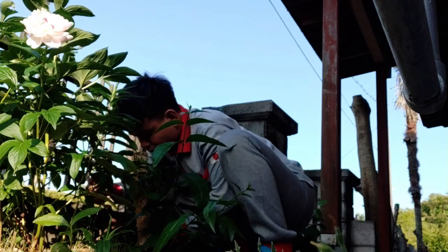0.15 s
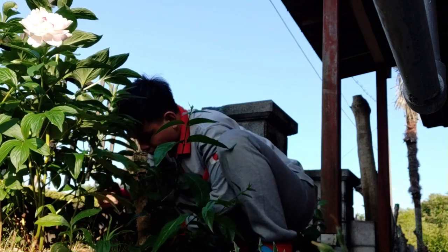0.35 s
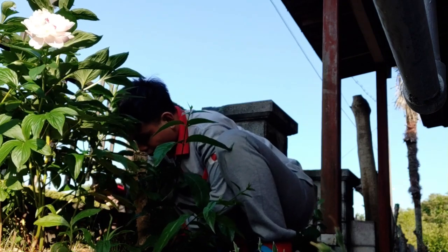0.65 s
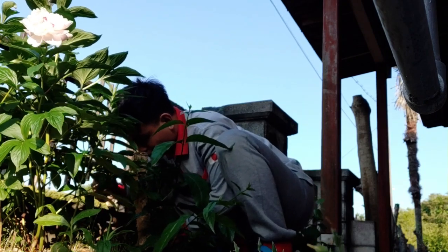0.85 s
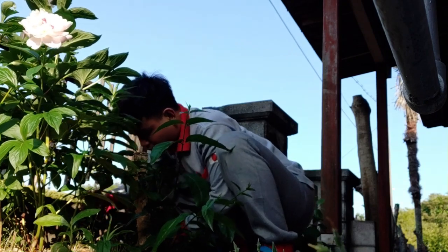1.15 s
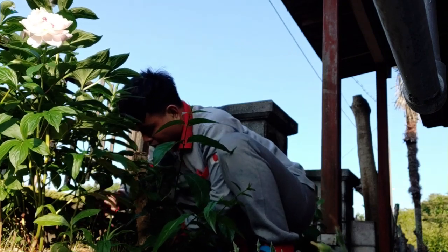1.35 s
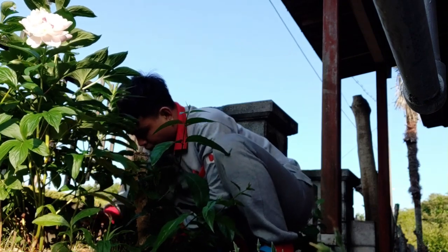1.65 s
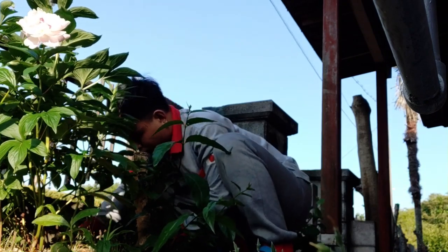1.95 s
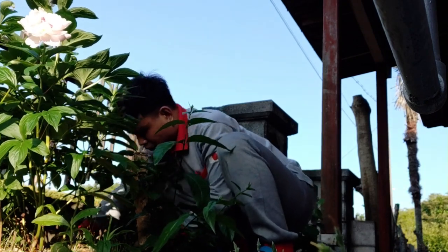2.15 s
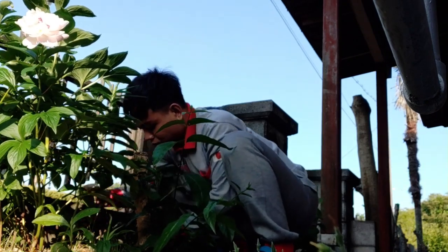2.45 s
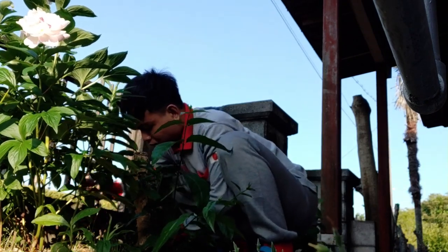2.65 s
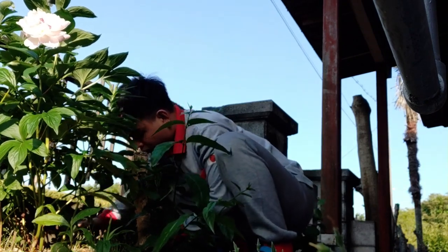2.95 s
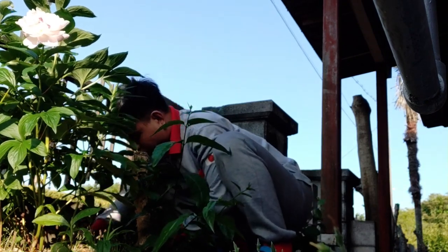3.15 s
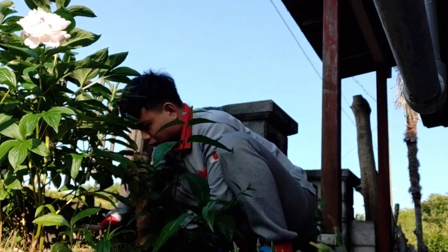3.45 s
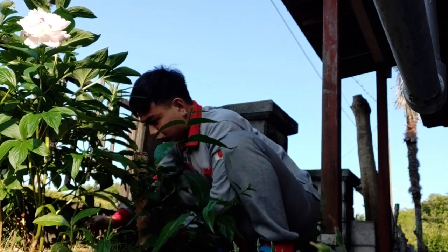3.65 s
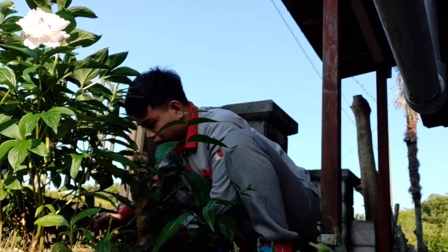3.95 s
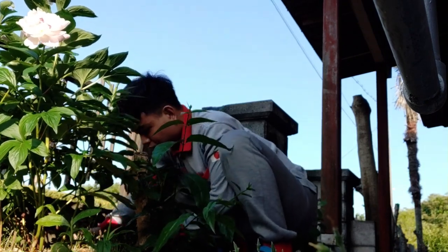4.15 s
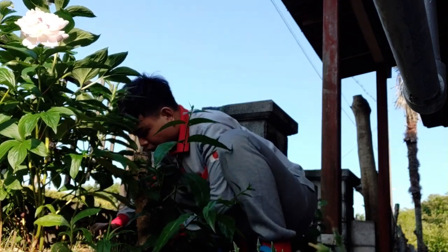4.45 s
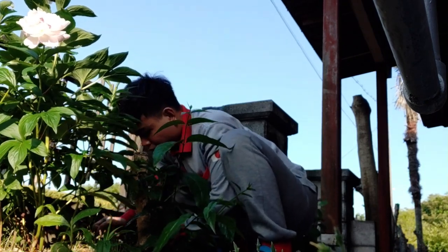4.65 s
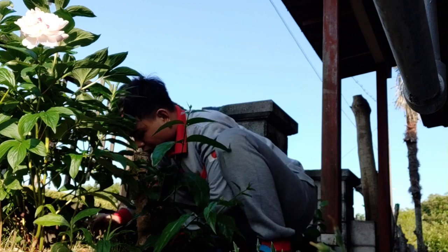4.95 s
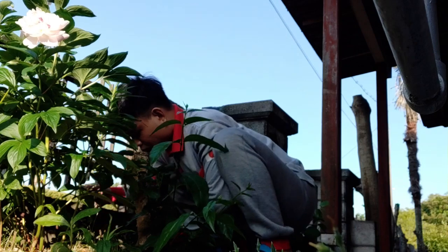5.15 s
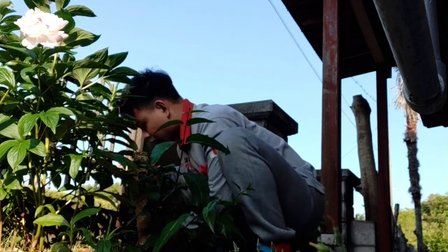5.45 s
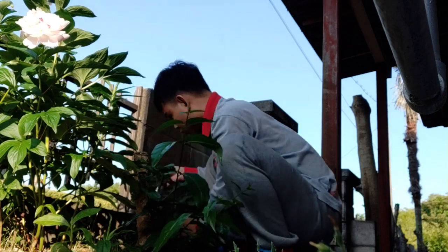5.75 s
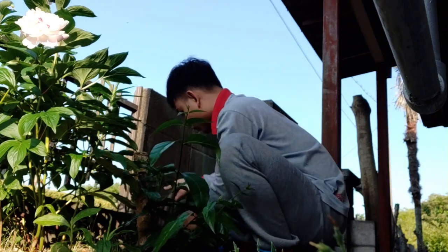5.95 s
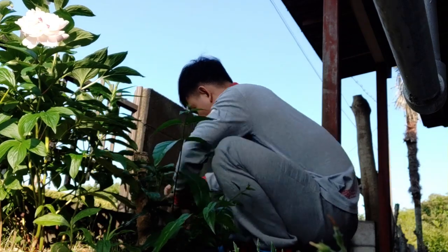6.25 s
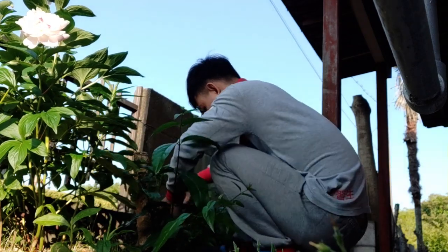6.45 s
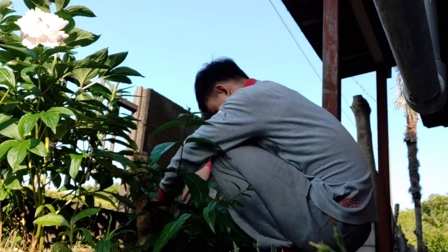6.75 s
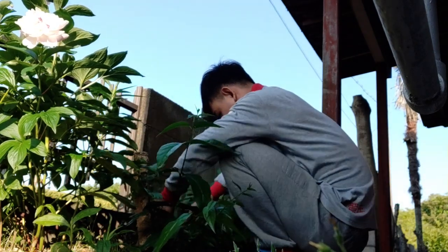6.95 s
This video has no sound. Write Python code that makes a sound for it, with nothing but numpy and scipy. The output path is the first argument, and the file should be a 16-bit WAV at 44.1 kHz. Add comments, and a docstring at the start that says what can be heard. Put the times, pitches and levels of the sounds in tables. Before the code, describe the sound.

Leaves rustle and stems tear as weeds are pulled by hand outdoors, then a thick stalk cracks sharply; low wind bumps early over distant roar.

```python
"""At first a breeze buffets two microphone ports, with dull low bumps, over a steady distant roar: filtered noise.
Throughout, weeds are pulled by hand beside a house: leaves brush, handfuls strain until they give, roots tear
and stems snap, built from coloured clicks and hiss with short resonances; the wall adds a short echo of noise taps.
Near the end a thick stalk cracks twice in quick splinters, as brief sine rings with noise edges and crunching
fibres, with dull thuds among and after them; a faint wavering sine hum joins the last half second."""
import sys
import numpy as np
from scipy import signal
from scipy.fft import rfft, irfft
from scipy.io import wavfile
from scipy.ndimage import uniform_filter1d

SR = 44100
rng = np.random.default_rng(int(sys.argv[2]) if len(sys.argv) > 2 else 0)


def materialize(psi):
    """Save the field psi as 16-bit PCM at rate SR to the path in sys.argv[1].

    A 1-D psi becomes a single channel; in a 2-D psi each row is a channel.
    """
    bounded = np.clip(np.atleast_2d(psi).T, -1, 1)
    quanta = np.round(bounded * 32767).astype(np.int16)
    wavfile.write(sys.argv[1], SR, quanta)


N = 312644
TIME = np.arange(N) / SR  # s
HALVES = np.array([[0.5], [-0.5]])  # shares a left-right level difference between the ports

# direction of the near sounds: hz, left_minus_right_db
PORT_BALANCE = [(200, -2.5), (800, -0.5), (1400, -1), (2200, -1), (2900, 8), (4400, 2.5), (6500, 2),
                (8500, -20), (11000, -11), (13500, -1), (16000, -12)]
# splinters of the thick stalk: start_s, peak_db (right port), ring_hz, length_s (the ring peaks after 0.88 of it),
# edge_db (the edge starts 0.5 dB below peak_db + edge_db, before colouring), edge_top_hz
SPLINTERS = [(6.3945, -26, 1900, .0004, -20, 4000), (6.3968, -26, 2100, .0004, -15, 4000),
             (6.4038, -25, 1900, .0004, -6, 10000), (6.4065, -12.5, 1580, .00098, -9, 14000),
             (6.4202, -19.5, 1560, .0006, -12, 12000), (6.4338, -14.5, 1610, .00092, -25, 12000),
             (6.4354, -21, 1600, .00055, 1, 12000), (6.8754, -26, 1810, .00055, -14, 5000),
             (6.8783, -21.5, 1790, .0007, -12, 5000), (6.8908, -34, 2000, .00064, -5, 8900),
             (6.9017, -23.5, 1860, .00065, -7, 4500)]


def amp(db):
    """A level in decibels is 20 times the logarithm of the amplitude ratio returned."""
    return 10 ** (np.asarray(db) / 20)


def unit(x):
    """Mean power sets the level: scales to an rms of 1."""
    return x / np.sqrt(np.mean(x ** 2) + 1e-20)


def read(points, hz):
    """Pitch is logarithmic in frequency: interpolates a table on a log-frequency axis."""
    f, value = np.transpose(points)
    return np.interp(np.log(hz + 1), np.log(f + 1), value)


def curve(rows):
    """A line in decibels is an exponential in amplitude: joins (s, dB) rows, near silence outside."""
    return np.interp(TIME, *np.transpose(rows), left=-120, right=-120)


def add(mix, s, sound):
    """Superposition: adds a sound to the mix in place, from time s."""
    part = mix[..., max(round(s * SR), 0):][..., :sound.shape[-1]]
    part += sound[..., :part.shape[-1]]


def together(gains):
    """Unrelated sounds add in power: their joint gain."""
    return np.sqrt(sum(gain ** 2 for gain in gains))


def stroke(start, length, rise_db_per_s, fall_db_per_s, sag_db_per_s=0):
    """Exponential growth and decay: gain rises until start, sags while held, then falls away."""
    t = TIME - start
    db = rise_db_per_s * np.minimum(t, 0)
    db -= sag_db_per_s * np.clip(t, 0, length)
    db -= fall_db_per_s * np.maximum(t - length, 0)
    return amp(np.maximum(db, -120))


def colour(x, spectrum, balance=((1, 0), (2, 0)), size=4096):
    """Minimum-phase filtering: a causal two-channel filter of unit power gain, by folding the cepstrum."""
    hz = np.fft.rfftfreq(size, 1 / SR)
    gain = amp(read(spectrum, hz) + HALVES * read(balance, hz))
    cepstrum = irfft(np.log(unit(gain) + 1e-6))
    cepstrum[:, 1:size // 2] *= 2
    cepstrum[:, size // 2 + 1:] = 0
    response = irfft(np.exp(rfft(cepstrum)))
    return signal.oaconvolve(np.atleast_2d(x), response, axes=1)[:, :N]


def crackle(per_s, spread_db, hiss, lag_limit=26):
    """Shot noise: random clicks of uneven size, each with its own port lag in samples, over a smooth hiss."""
    size = amp(spread_db * np.minimum(rng.exponential(1, N), 4)) * rng.choice([-1, 1], N)
    clicks = size * (rng.random(N) < per_s / SR)
    later = np.minimum(np.arange(N) + rng.integers(0, lag_limit, N), N - 1)
    ports = np.array([clicks, np.bincount(later, clicks, N)])
    return unit(unit(ports) + hiss * rng.standard_normal((2, N)))


def distance(level_db=-54.03):
    """Partial coherence: a dull steady roar whose likeness at the ports varies with frequency."""
    # hz, level_db (per Hz)
    roar = [(20, -14.5), (45, -10), (85, 1), (130, -3.5), (270, -1.5), (400, -7.5), (750, -10.5),
            (1300, -8.5), (1720, -16), (1950, -24.5), (2300, -41.5), (4000, -61), (8000, -59.5),
            (11000, -76), (16000, -64.5)]
    # hz, correlation (left-right likeness, negative when opposed)
    likeness = [(60, 0.87), (130, 0.94), (290, 0.91), (640, 0.26), (1410, -0.68), (3100, 0.94),
                (6820, 0.01), (15000, -0.03)]
    # hz, left_minus_right_db
    tilt = [(100, -0.5), (220, -0.5), (380, -2.5), (700, -3.5), (1300, 0), (2400, 9.5)]
    a, b = rfft(rng.standard_normal((2, N)))
    same = np.clip(read(likeness, np.fft.rfftfreq(N, 1 / SR)), -1, 1)
    noise = irfft([a, same * a + np.sqrt(1 - same ** 2) * b], N)
    return amp(level_db) * colour(noise, roar, tilt)


def wind():
    """Turbulent pressure is unrelated between ports: a dying breeze, and eddies striking one port each."""
    # hz, level_db (per Hz)
    rumble = [(15, -24), (40, -5.5), (70, 7), (150, 3.5), (220, -10), (350, -25), (600, -28.5),
              (1500, -66.5), (4000, -92)]
    # steady breeze, before the common 3.5 dB cut below: time_s, level_db
    breeze = [(0, -52.5), (1.0, -45.5), (1.5, -52.5), (1.85, -50), (2.45, -61.5), (4, -75)]
    # eddies, before the same cut: peak_s, peak_db, half_width_s (to 1/e of power), port (0 left, 1 right)
    gusts = [(.06, -33, 0.062, 1), (.19, -35.5, 0.06, 1), (.285, -40, 0.013, 1), (0.457, -30, 0.013, 1),
             (.575, -34, 0.02, 1), (.7, -34, 0.014, 0), (.82, -37, 0.033, 1), (.99, -38, .02, 0),
             (1.11, -33.5, 0.032, 1), (1.47, -39, 0.037, 1), (1.655, -39, 0.038, 1),
             (1.665, -37.5, 0.013, 0), (1.775, -38, 0.027, 1), (2.28, -42.5, 0.021, 1),
             (2.84, -48, 0.033, 0), (3.14, -51, 0.06, 1)]
    power = np.tile(amp(curve(breeze)) ** 2, (2, 1))
    for s, db, half_width, port in gusts:
        power[round(port)] += amp(db) ** 2 * np.exp(-((TIME - s) / half_width) ** 2)
    return colour(rng.standard_normal((2, N)), rumble) * np.sqrt(power) * amp(-3.5)


def hum(start_s=6.54, length_s=0.55, level_db=-61.5, pitch_hz=273.4, waver_hz=4, waver_s=0.0464):
    """Frequency modulation: phase is the sum of a pitch that wavers by waver_hz rms in a faint low tone."""
    waver = unit(uniform_filter1d(rng.standard_normal(N), int(waver_s * SR)))
    level = amp(level_db) * stroke(start_s, length_s, rise_db_per_s=350, fall_db_per_s=350)
    phase = 2 * np.pi * np.cumsum(pitch_hz + waver_hz * waver) / SR
    return level * np.sqrt(2) * np.sin(phase)


def yard(x, echo_db):
    """Diffuse reverberation: wall and eaves return sparse random taps that decay by frequency."""
    # hz, t60_s
    reverberation = [(200, .35), (1500, 0.49), (4000, 0.05), (8000, 0.11), (15000, 0.26)]
    t = np.arange(SR // 2) / SR
    taps = rng.standard_normal((2, len(t))) * (rng.random((2, len(t))) < .15) * (t > .004)
    hz, when, z = signal.stft(taps, SR, nperseg=256)
    decay = amp(-60 * when / read(reverberation, hz)[:, None])
    tail = signal.istft(z * decay, SR, nperseg=256)[1]
    return x + amp(echo_db) * signal.oaconvolve(x, tail / np.linalg.norm(tail[0]), axes=1)[:, :N]


def thuds():
    """Heavy damping: short low pushes swell and die with hardly any ring."""
    # start_s, peak_db (of the right envelope), pitch_hz, swell_s, left_minus_right_db
    bumps = [(.102, -29, 152, 0.0028, -9), (0.213, -23, 155, 0.0027, -27), (1.14, -23.5, 169, 0.002, -30),
             (1.492, -32.5, 145, 0.0024, -22), (1.766, -34.5, 167, 0.0022, -2.5),
             (6.409, -55, 220, 0.0049, 2), (6.432, -34.5, 380, 0.0015, -4), (6.899, -42, 154, 0.0061, 1),
             (6.905, -34.5, 367, 0.001, 1), (6.917, -41.5, 304, 0.003, 2), (6.922, -44.5, 91, 0.0077, 1)]
    out, t = np.zeros((2, N)), np.arange(SR // 10) / SR
    for s, db, hz, swell, left_db in bumps:
        push = t / swell * np.exp(1 - t / swell) * np.sin(2 * np.pi * hz * t)
        add(out, s, amp([[db + left_db], [db]]) * push)
    return out


def faint_rings(per_s=1500, spread_db=0.5, cycles=5, count=30):
    """Damped sines: many brief faint rings at random times, over thirty pitches, make the rustle more tonal."""
    out, t = np.zeros((2, N)), np.arange(SR // 50) / SR
    size = amp(spread_db * np.minimum(rng.exponential(1, N), 3)) * (rng.random(N) < per_s / SR)
    choice = rng.integers(0, count, N)
    pitches = np.linspace(1300, 9000, count) + rng.uniform(-100, 73, count)
    for k, hz in enumerate(pitches):
        phase = 2 * np.pi * (hz * t + rng.random((2, 1)))
        ring = np.sqrt(hz) * np.exp(-t * hz / cycles) * np.sin(phase)  # the root evens out the energy
        out += signal.oaconvolve((size * (choice == k))[None], ring, axes=1)[:, :N]
    return unit(out)


def leaf_grains(clump_db, clump_s, ring_db):
    """Friction by many small contacts: leaves slide past the hands in clumps of clicks, with faint rings."""
    clumps = unit(uniform_filter1d(rng.standard_normal(N), int(clump_s * SR)))
    grains = crackle(per_s=2200, spread_db=1.0, hiss=0.92) + amp(ring_db) * faint_rings()
    return unit(grains) * amp(clump_db * clumps - 1.0)


def patchy(x, patchy_db=5, patch_hz=300, patch_s=.09):
    """Random time-frequency gain: bands of the rustle swell and fade in irregular patches."""
    hz, _, z = signal.stft(x, SR, nperseg=512)
    patches = rng.standard_normal(z.shape[1:])
    patches = uniform_filter1d(patches, max(round(patch_hz / hz[1]), 1), axis=0)
    patches = uniform_filter1d(patches, max(round(patch_s * SR / 256), 1), axis=1)
    gain = amp(patchy_db * np.minimum(unit(patches), 1.5))
    return signal.istft(z * unit(gain), SR, nperseg=512)[1][:, :N]


def rustle():
    """Contact excitation: an arm sweeps the leaves; each click fizzes at the edge and knocks the blade."""
    # start_s, length_s, level_db (of the gain on the grains), body_db (knocks are 1.5 dB below this, re fizz)
    brushes = [(0.0, 0.13, -65.5, 0.5), (0.332, 0.025, -62.5, -3.5), (.56, 0.065, -70.5, -1),
               (0.826, 0.0071, -66.5, -2.5), (0.919, 0.096, -60, -1.5), (1.157, 0.12, -58, 0.5),
               (1.328, .1, -64.5, 4.5), (1.445, 0.1, -57, 2.5), (1.563, 0.11, -53.5, 2),
               (1.719, 0.47, -60, 1.5), (2.403, 0.19, -70.5, 1), (2.752, 0.22, -62.5, -21),
               (2.993, 0.28, -63.5, 5.5), (3.535, 0.36, -71, 5.5), (4.113, .18, -64, 5.5),
               (4.386, 0.2, -66, 3.5), (4.672, 0.094, -66, 3.5), (5.097, 0.098, -63, 2.5),
               (5.397, 0.087, -92, 1.5), (5.497, 0.16, -77, -3), (5.631, 0.26, -68, 9),
               (6.073, 0.46, -63.5, 4.5), (6.293, 0.21, -54.5, 6.5), (6.508, 0.2, -59.5, 5.5),
               (6.78, 0.44, -70, 10)]
    # blade knocks: hz, level_db (per Hz)
    blade = [(100, -26), (400, 1.5), (800, -11), (1100, 13.5), (1380, 5), (1750, 7), (2250, 2), (2850, 2.5),
             (3600, -16), (6000, -42.5)]
    # edge fizz: hz, level_db (per Hz)
    leaf_edge = [(500, -57), (2200, -28.5), (2900, -3.5), (3800, -12), (4800, 0.5), (6500, 3), (8200, -1),
                 (9200, -7), (10500, -7.5), (12300, -14.5), (13500, -10), (15500, -15)]
    fizz_gains, knock_gains = [], []
    for s, length, db, body_db in brushes:
        # the leaves are met, the arm slows, the leaves settle
        gain = amp(db) * stroke(s, length, rise_db_per_s=768.5, fall_db_per_s=167, sag_db_per_s=18.5)
        fizz_gains.append(gain)
        knock_gains.append(gain * amp(body_db - 1.5))
    grains = leaf_grains(clump_db=1.7, clump_s=.0093, ring_db=-9)
    fizz = colour(grains * together(fizz_gains), leaf_edge, PORT_BALANCE)
    knocks = colour(grains * together(knock_gains), blade, PORT_BALANCE)
    return patchy(fizz + knocks)


def tugs(sharpness=10):
    """Friction under load: the scrape swells with strain and stops as the plant gives; taut stems resonate."""
    # fully_taut_s, level_db (of the gain on the grains), build_up_s (e-folding), ring_db (re scrape gain)
    handfuls = [(0.461, -48.5, .012, -3), (1.47, -60, .01, 7.5), (1.62, -57, 0.025, 5.5),
                (2.522, -57.5, 0.055, 3.5), (2.972, -46.5, 0.051, -4.5), (3.459, -58.5, 0.022, -6.5),
                (5.058, -52, 0.019, -2), (6.39, -57, 0.049, -9), (7.015, -53.5, 0.051, -10)]
    # pitch_hz, level_db
    taut_stems = [(1350, -5.5), (2850, -20.5)]
    # stalks scraping through the fist: hz, level_db (per Hz)
    fist = [(150, -20), (500, 3.5), (1150, 0.5), (1900, 1), (2850, 3), (3700, -7.5), (4800, -1), (6300, 6),
            (8200, -2), (9500, -8), (13000, -8), (15500, -14)]
    scrape_gains, ring_gains = [], []
    for s, db, build_up, ring_db in handfuls:
        rise = 20 / np.log(10) / build_up  # dB per s
        gain = amp(db) * stroke(s, length=0.02, rise_db_per_s=rise, fall_db_per_s=308)
        scrape_gains.append(gain)
        ring_gains.append(gain * amp(ring_db))
    grains = leaf_grains(clump_db=1.65, clump_s=0.023, ring_db=-7)
    scrape = colour(grains * together(scrape_gains), fist, PORT_BALANCE)
    drive = grains + .5 * grains[::-1]  # each port hears some of the other
    stems = np.zeros((2, N))
    for hz, db in taut_stems:
        ring = unit(signal.lfilter(*signal.iirpeak(hz, sharpness, fs=SR), drive))
        stems += amp(db + HALVES * read(PORT_BALANCE, hz)) * ring
    return patchy(scrape) + stems * together(ring_gains)


def tears(sharpness=9):
    """Sudden release of strain: fibres part in a burst that swells fast, decays and rings the stem."""
    # roots and thin stems: start_s, level_db (of the envelope peak), decay_s, ring_hz, ring_db (re burst)
    snaps = [(0.022, -56, 0.0063, 2900, -12), (0.07, -57, 0.012, 7150, 0.5), (0.115, -52, 0.019, 7140, -12),
             (.37, -52.5, 0.0084, 8200, 0), (.576, -57.5, 0.011, 7760, -7), (0.909, -51.5, 0.006, 2800, 4),
             (0.9366, -29, 0.0089, 7300, -4.5), (0.95, -41, 0.018, 2800, -8.5),
             (1.3052, -49, 0.0072, 8300, -5), (1.354, -44.5, 0.0087, 8300, -9),
             (1.398, -51.5, 0.0052, 1270, 9), (1.429, -48, 0.0057, 8200, -6),
             (1.4481, -37.5, 0.0038, 1290, -6), (1.57, -40, 0.0066, 5860, -29), (1.978, -59, .003, 2010, 4),
             (2.467, -58, 0.015, 2880, 3), (3.563, -62, 0.004, 2740, 7.5), (4.1, -59, 0.027, 3060, 1),
             (4.358, -62, 0.0021, 7860, -6), (4.532, -40, 0.0027, 1630, -6.5), (4.635, -53, 0.0043, 596, 3),
             (4.678, -50.5, 0.0027, 1540, 1), (4.728, -62, 0.0033, 1450, 13.5),
             (4.85, -63, 0.0038, 5100, -8.5), (5.630, -60, 0.0021, 1850, 10), (6.068, -62, 0.0076, 6350, 6),
             (6.38, -60, 0.0018, 2000, -8), (6.485, -45, 0.0027, 2360, -5), (6.5337, -45, 0.0013, 9300, 7),
             (6.536, -43, 0.0093, 2900, -8)]
    # fibre and leaf: hz, level_db (per Hz)
    fibre = [(100, -26), (400, 8), (1000, 4), (1400, 1.5), (2300, 0.5), (2900, 4), (3800, -10.5), (4800, 1),
             (6500, 3.5), (8200, 0), (9500, -12), (11000, -10.5), (12500, -6.5), (15500, -7)]
    fibres, t = crackle(per_s=6200, spread_db=1, hiss=0.59), np.arange(SR // 6) / SR
    bursts, rings = np.zeros((2, N)), np.zeros((2, N))
    for s, db, decay, hz, ring_db in snaps:
        rise = .3 * decay
        shape = amp(db) * np.minimum(t / rise, 1) * np.exp(-np.maximum(t - rise, 0) / decay)
        burst = shape * fibres[:, round(s * SR):][:, :len(t)]
        ring = signal.lfilter(*signal.iirpeak(hz, sharpness, fs=SR), burst + .5 * burst[::-1])
        ring = unit(ring * amp(HALVES * read(PORT_BALANCE, hz)))
        size = np.sqrt(np.mean(shape ** 2))  # the energy of the pull, shared out among the fibres
        add(bursts, s, size * unit(burst))
        add(rings, s, size * amp(ring_db) * ring)
    return colour(bursts, fibre, PORT_BALANCE) + rings


def crunch(level_db=-21.5):
    """Progressive fracture: small fibres give way inside the stalk around each splinter."""
    # hz, level_db (per Hz)
    stalk_body = [(150, -22), (370, -4), (550, -13), (700, -2), (900, -7), (1300, 1), (1600, -7),
                  (2000, -0.5), (2400, -12.5), (2900, -2), (3700, -28.5), (6000, -16.5), (10000, -25),
                  (15000, -82)]
    strain = together(
        amp(db + level_db) * stroke(s, length=0.0053, rise_db_per_s=2200, fall_db_per_s=720)
        for s, db, *_ in SPLINTERS)
    fibres = crackle(per_s=3200, spread_db=1.5, hiss=0.32)
    return colour(fibres * strain, stalk_body) * amp([[-2], [0]])


def stalk(left_db=-3.5, left_lag_s=.00007, edge_s=0.00057):
    """Brittle fracture: each splinter rings the stalk for a few cycles and throws off a sharp noise edge."""
    # hz, level_db (per Hz)
    edge_colour = [(150, -15), (400, -7), (1000, 14), (2900, 0.5), (3800, -1.5), (5000, -1), (8000, -2),
                   (10500, -1.5), (13000, -3), (16000, -32)]
    rings, edges, t = np.zeros((2, N)), np.zeros((2, N)), np.arange(SR // 40) / SR
    heard = np.maximum(t - np.array([[left_lag_s], [0]]), 0)  # the left port hears the ring later
    for s, db, hz, length, edge_db, top_hz in SPLINTERS:
        u = heard / (0.88 * length)
        swell = (u * np.exp(1 - u)) ** 2
        add(rings, s, -amp(db) * swell * np.sin(2 * np.pi * hz * heard))
        edge = amp(db + edge_db - 0.5) * np.exp(-t / edge_s) * rng.standard_normal((2, len(t)))
        add(edges, s, signal.lfilter(*signal.butter(4, top_hz, fs=SR), edge))
    return rings * amp([[left_db], [0]]) + colour(edges, edge_colour, PORT_BALANCE)


def scene():
    """Superposition: weeding and stalk with their echoes, over thuds, wind, distance and hum."""
    weeding = yard(rustle() + tugs() + tears(), echo_db=-13.5)
    cracking = yard(stalk() + crunch(), echo_db=-24.5)
    return weeding + cracking + thuds() + wind() + distance() + hum()


def record(dry, cutoff_hz=15900):
    """Band limiting: a linear-phase low-pass filter removes the highest treble."""
    lowpass = signal.firwin(511, cutoff_hz, window=("kaiser", 9), fs=SR)
    return signal.oaconvolve(dry, lowpass[None], "same")


dry = scene()
out = record(dry)
materialize(out)
```